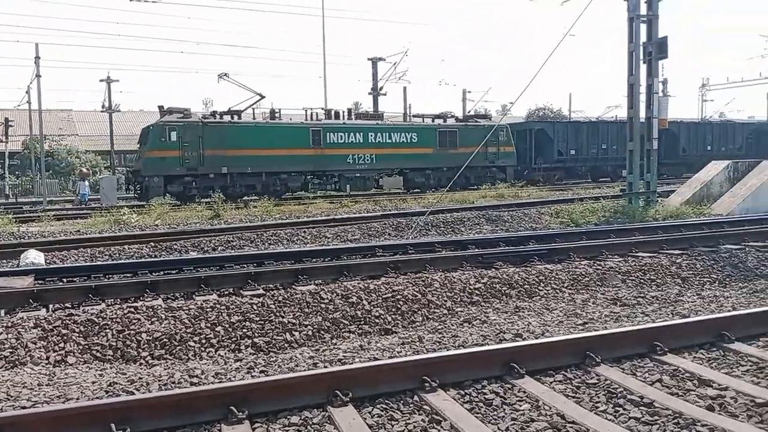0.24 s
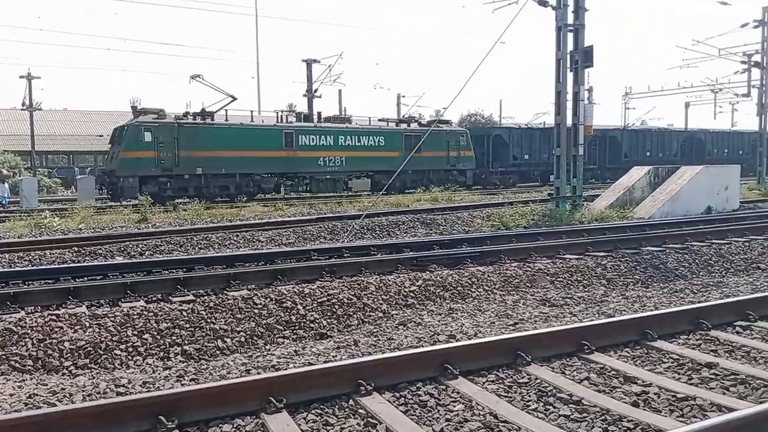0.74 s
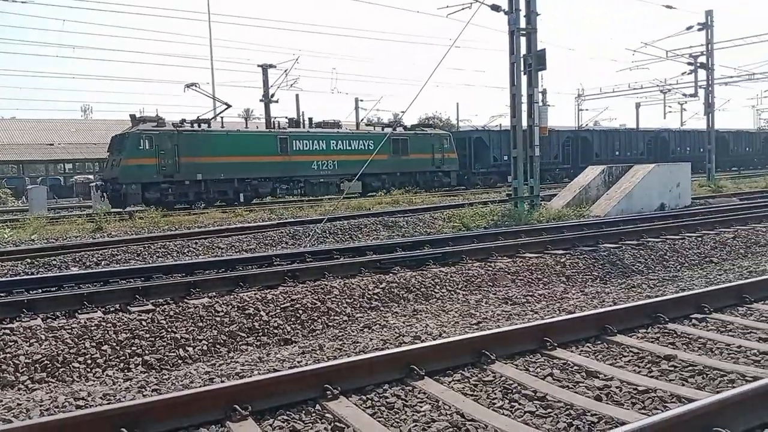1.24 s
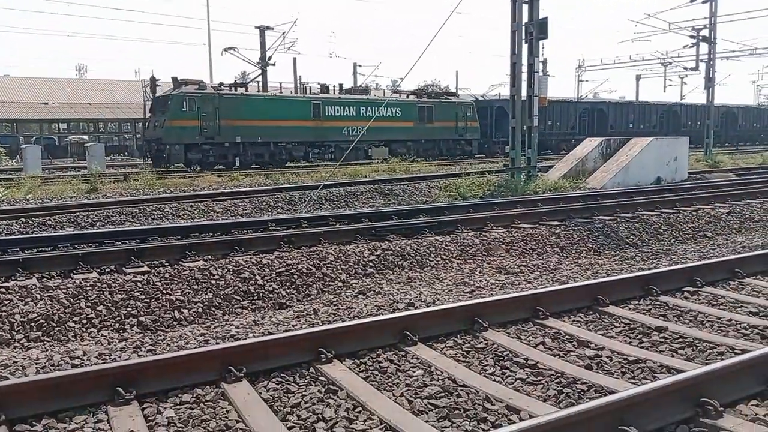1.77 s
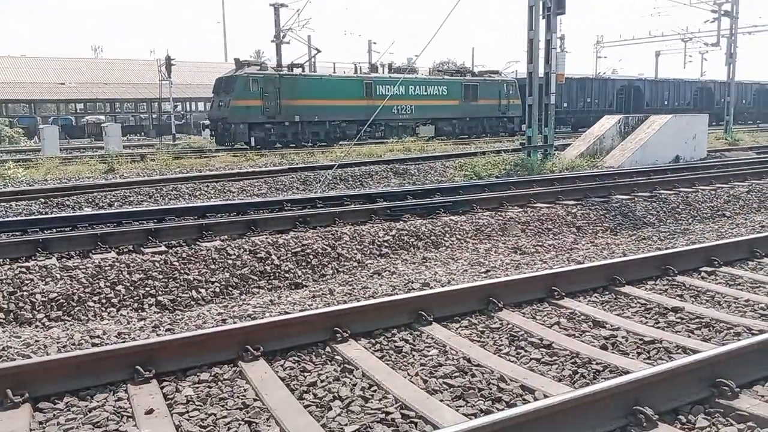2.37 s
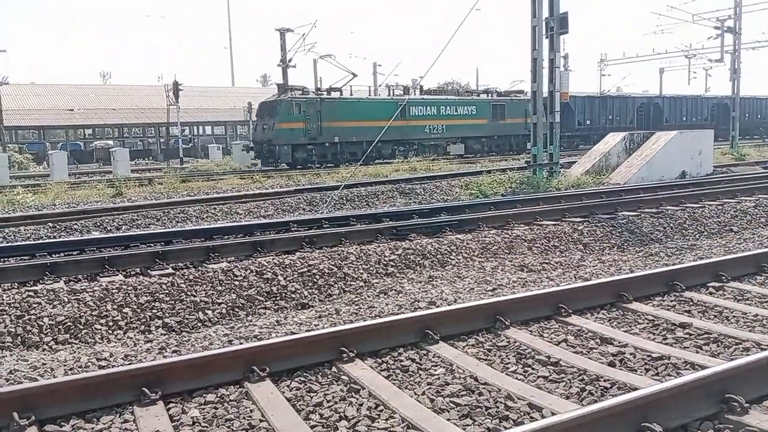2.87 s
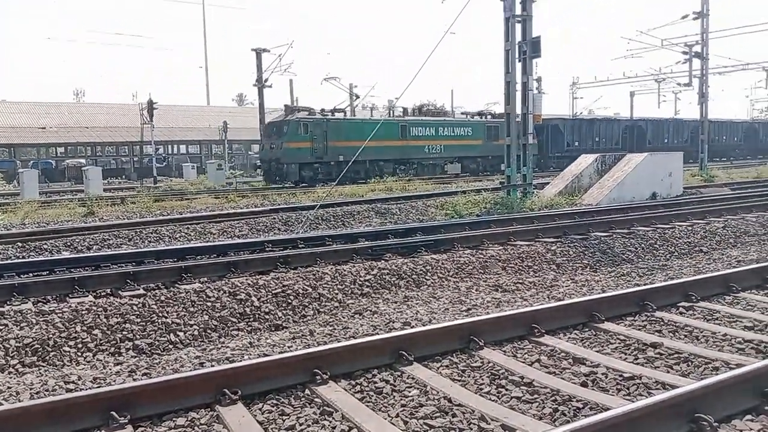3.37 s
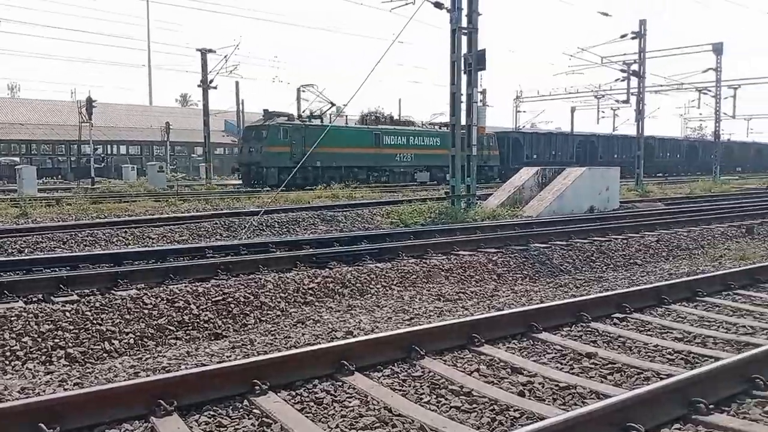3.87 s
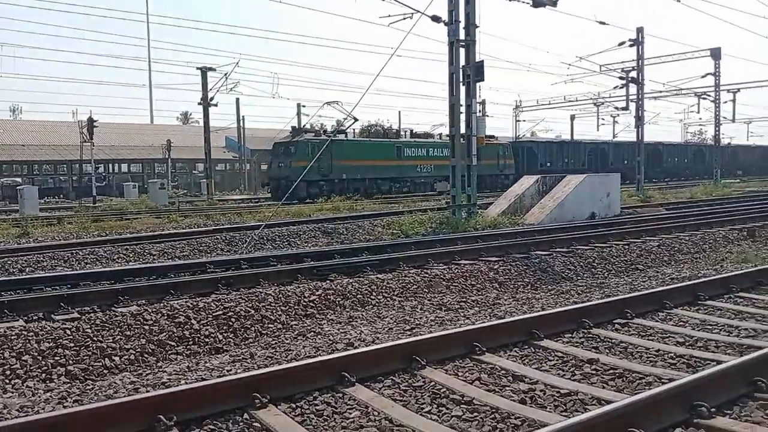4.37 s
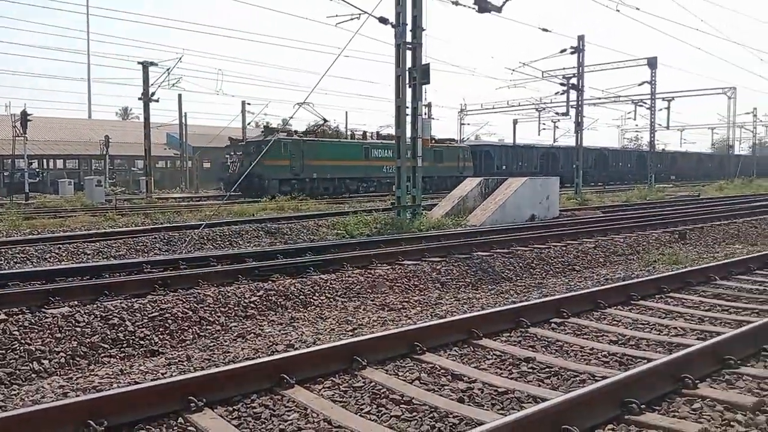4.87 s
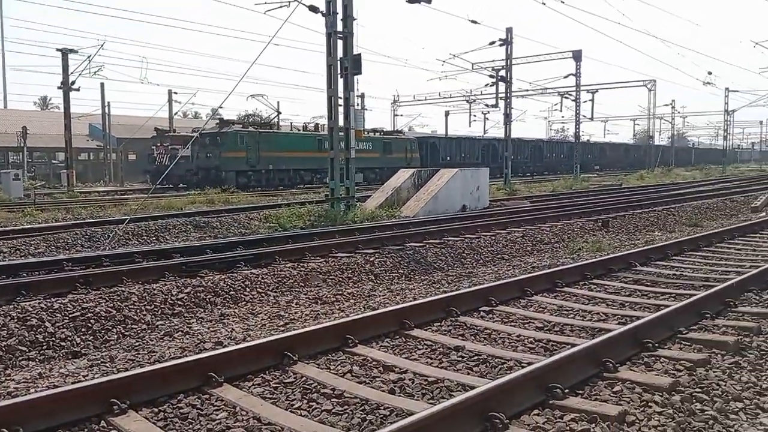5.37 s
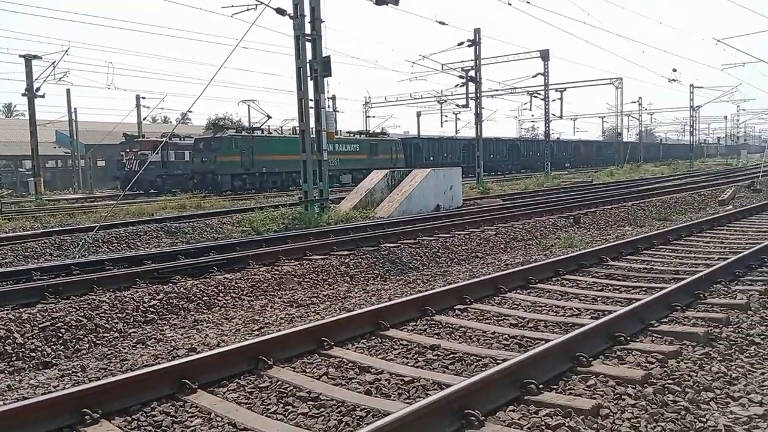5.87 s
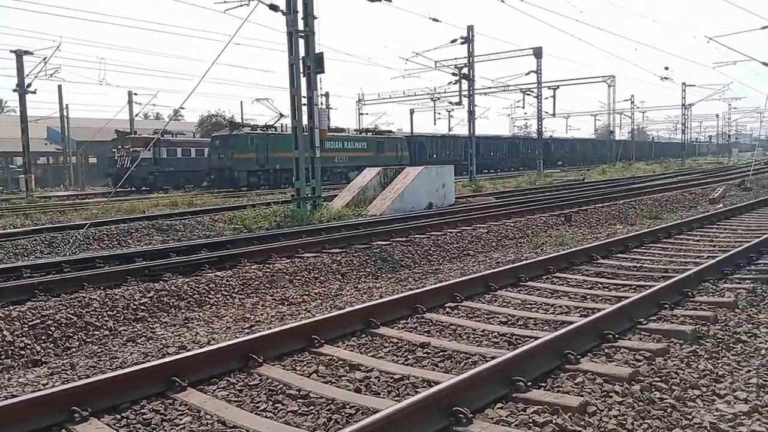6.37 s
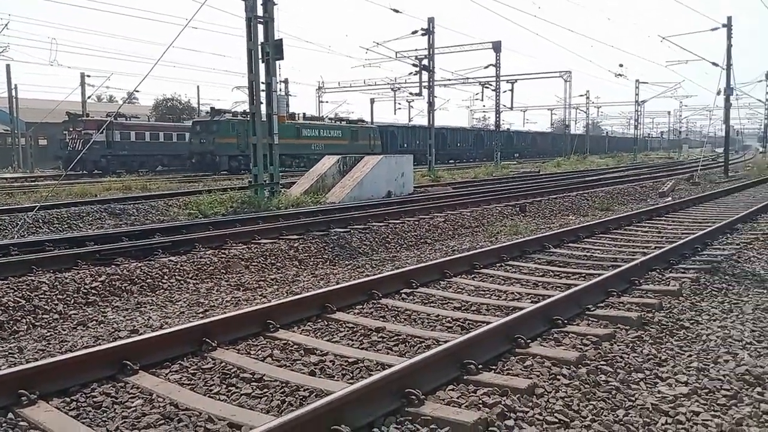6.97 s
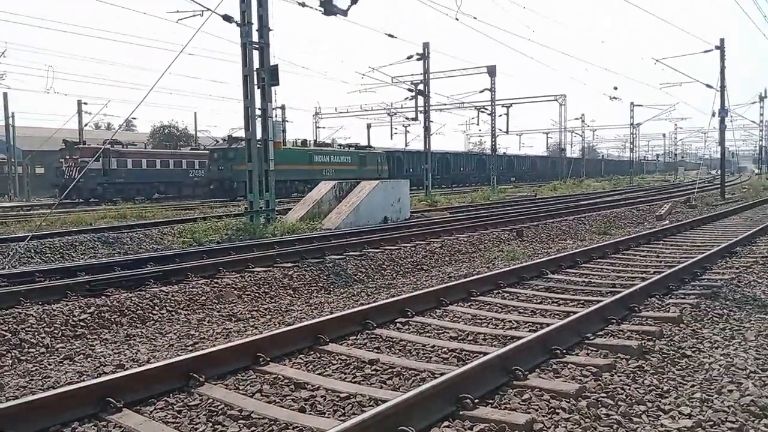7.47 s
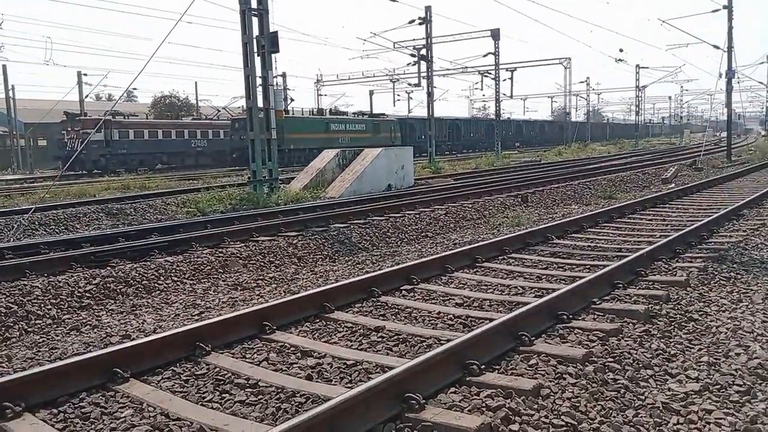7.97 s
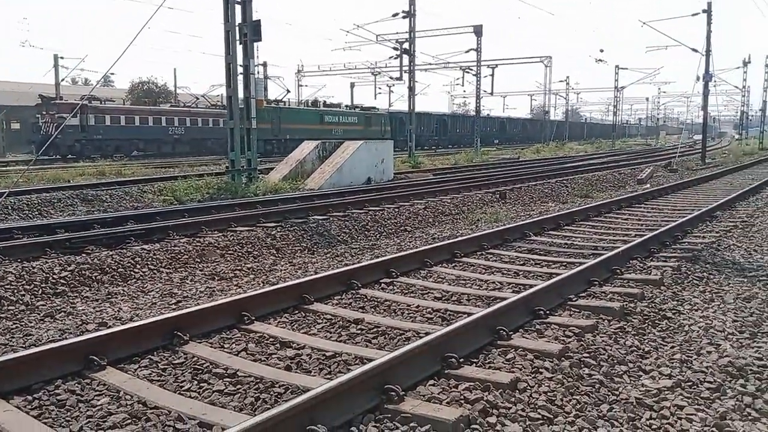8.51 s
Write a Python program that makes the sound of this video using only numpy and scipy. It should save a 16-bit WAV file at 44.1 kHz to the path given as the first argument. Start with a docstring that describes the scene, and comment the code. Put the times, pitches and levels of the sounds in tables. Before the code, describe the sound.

Outdoors in a rail yard, a locomotive drones low and whines faintly while wheels roll and rasp. After tiny spits of air, six bright brake-air bursts snap open, sag and shut; the last two are softer, longer and nearly joined. The hiss scatters briefly off wagons and ground. Light wind touches a single mono microphone, and the background sinks under the loudest hisses.

```python
"""Air brakes in a rail yard

A freight train creeps through a yard while its brakes blow off air in six sudden bursts of shaped noise.
Each valve snaps open and its jet sags as the pressure falls; ground and wagons throw the hiss back.
Behind it wheels roll, rasp and squeak, and a locomotive drones and whines on blurred resonances.
Light wind touches a single microphone; all the background sinks under the loudest hiss."""
import sys
import numpy as np
from scipy import signal
from scipy.fft import rfft, irfft
from scipy.io import wavfile
from scipy.ndimage import uniform_filter1d

SR = 44100
rng = np.random.default_rng(int(sys.argv[2]) if len(sys.argv) > 2 else 0)


def store_pcm(level_fs):
    """Save levels as 16-bit WAV."""
    pcm = np.round(np.clip(level_fs, -1, 1) * 32767).astype(np.int16)
    wavfile.write(sys.argv[1], SR, np.atleast_2d(pcm).T)


N = 385564
TIME = np.arange(N) / SR  # s


def gain_of(db):
    """Decibels to amplitude."""
    return 10 ** (np.asarray(db) / 20)


def evened(x):
    """Scales to an rms of one."""
    return x / np.sqrt(np.mean(x ** 2) + 1e-20)


def read_spectrum(points, hz):
    """Reads a spectrum on a log-frequency axis."""
    f, value = np.transpose(points)
    return np.interp(np.log(hz + 1), np.log(f + 1), value)


def level(rows):
    """A level curve as a gain for every sample."""
    return gain_of(np.interp(TIME, *np.transpose(rows)))


def hump(t, s, rise_s, fall_s):
    """Climbs from zero at s to one, then rounds off back to zero."""
    climb = np.clip((t - s) / rise_s, 0, 1)
    return climb * (1 - np.clip((t - s - rise_s) / fall_s, 0, 1) ** 2)


def swells(rows):
    """Gain of separate soft swells, each half a cosine long."""
    return sum(gain_of(db) * np.cos(np.pi * np.clip((TIME - middle) / length, -.5, .5))
               for middle, length, db in rows)


def wander(rate_hz):
    """Smooth random motion up to about the given rate, with an rms of one."""
    hz = np.fft.rfftfreq(N, 1 / SR)
    return evened(irfft(rfft(rng.standard_normal(N)) * np.exp(-(hz / rate_hz) ** 2), N))


def ring(hz, width_hz):
    """A tone blurred to the given width, as from turbulence in a resonance."""
    r = np.exp(-np.pi * width_hz / SR)
    sway = signal.lfilter([1], [1, -2 * r, r * r], rng.standard_normal((2, N)))
    turning = np.exp(2j * np.pi * hz * TIME)
    return evened(((sway[0] + 1j * sway[1]) * turning).real)


def noise(colour, patchy_db, patch_hz, patch_s, size=1024):
    """Coloured noise whose level drifts in patches of time and frequency."""
    hz, hop = np.fft.rfftfreq(size, 1 / SR), size // 4
    a, b, patches = rng.standard_normal((3, N // hop + 5, len(hz)))
    patches = uniform_filter1d(patches, max(1, round(patch_s * SR / hop)), axis=0)
    patches = evened(uniform_filter1d(patches, max(1, round(patch_hz / hz[1])), axis=1))
    z = (a + 1j * b) * gain_of(read_spectrum(colour, hz) + patchy_db * patches)
    return evened(signal.istft(z.T, nperseg=size, noverlap=size - hop)[1][:N])


# moments within the bursts where the hiss sharpens, the later two also swelling louder:
# (time [s], rise [s], fall [s], lift [dB], extra sharpness [dB])
HISS_SURGES = [(2.865, 0.046, 0.33, 0, 5.5), (4.515, 0.0084, 0.13, -1, 5), (6.88, .08, 0.96, 5, 1),
               (7.71, 0.25, 0.32, 4.5, 3)]
OPEN_S, KICK_S = .008, .028  # the valve opens quickly; its kick of trapped air dies away


def jet(burst, colour, roar_hz=3900, sharp_hz=6400, dull_power=0.97, size=65536):
    """One valve snaps open; its hiss sags and its edge shifts as pressure falls, while the roar swells and ebbs."""
    start, end, close_s, start_db, sag_db, hold, roar_peak, arch_db, dull_db, kick_db, _ = burst
    span = np.flatnonzero(TIME > start - OPEN_S / 2)[:size]
    t = TIME[span]
    age = np.maximum(t - start, 0)
    spent = np.minimum(age / (end - start), 1)

    jet_db = start_db - sag_db * spent ** hold + kick_db * np.exp(-age / KICK_S)
    roar_db = -arch_db * (spent - roar_peak) ** 2
    sharp_db = -dull_db * spent ** dull_power
    for s, rise_s, fall_s, lift_db, sharper_db in HISS_SURGES:
        surge = hump(t, s, rise_s, fall_s)
        jet_db = jet_db + lift_db * surge
        sharp_db = sharp_db + sharper_db * surge
    jet_db = jet_db - 20 * np.maximum(t - end, 0) / close_s

    # split the coloured noise into low roar, core and sharp edge
    hz = np.fft.rfftfreq(size, 1 / SR)
    air = rfft(rng.standard_normal(size)) * gain_of(read_spectrum(colour, hz))
    low = 1 / (1 + (hz / roar_hz) ** 20)
    high = 1 - 1 / (1 + (hz / sharp_hz) ** 20)
    roar, core, edge = (irfft(air * share, size)[:len(t)] for share in (low, 1 - low - high, high))

    # centre the moves of each band on the loud part of the burst
    weight = gain_of(2 * jet_db)
    roar = roar * gain_of(roar_db - np.average(roar_db, weights=weight))
    edge = edge * gain_of(sharp_db - np.average(sharp_db, weights=weight))
    hiss_rms = np.sqrt(np.average((core + edge) ** 2, weights=weight))
    valve = np.clip((t - start) / OPEN_S + .5, 0, 1)
    out = np.zeros(N)
    out[span] = valve * gain_of(jet_db) * (roar + core + edge) / hiss_rms
    return out


# small spits of air: (time [s], rise [s], decay [s], level [dB])
AIR_SPITS = [(.652, 0.0054, 0.34, -31.5), (.712, .011, 0.0099, -24.5), (2.02, 0.046, 0.027, -28.5)]
# their colour: (frequency [Hz], relative density [dB per Hz])
SPIT_COLOUR = [(2500, -6), (4200, 0), (5500, 8.5), (6800, -5), (9000, -17.5), (15000, -39)]


def spits():
    """Valves that lift for an instant and reseat."""
    lift = np.zeros(N)
    for s, rise_s, decay_s, db in AIR_SPITS:
        opening = np.clip((TIME - s) / rise_s, 0, 1)
        lift += opening * np.exp(-np.maximum(TIME - s - rise_s, 0) / decay_s) * gain_of(db)
    return lift * noise(SPIT_COLOUR, patchy_db=1, patch_hz=600, patch_s=.03)


# bursts of air: (valve opens [s], valve closes [s], time to fall 20 dB on closing [s], level [dB],
# sag by the end [dB], power of the sag curve (high = sags late) [-], roar peak as share of the burst [-],
# drop of the roar one burst length from its peak [dB], dulling by the end (negative = sharpens) [dB],
# opening kick [dB], seepage after closing relative to level [dB])
AIR_BURSTS = [ (0.936, 1.554, 0.031, -13.5, 10.2, 4.5, 0.13, 14, -4, -1.5, -12),
              (2.786, 3.256, 0.066, -12, 5.1, 5.2, .24, 9.9, -0.5, 1.5, -14.5),
              (4.38, 5.298, 0.058, -13.5, 8.25, 0.89, .47, 21, 6, 1.5, -19),
              (5.474, 5.774, 0.041, -15, 1.8, 1.2, 0.6, 11, 7.5, 2, -46),
              (6.245, 7.434, 0.13, -19.5, 6.6, 1.2, 0.67, 10.4, 2.5, 0, -26),
              (7.699, 8.74, .1, -23, 2.5, 1.2, 1, 4.8, 1, -3, -19), ]
# colour of each jet in turn: (frequency [Hz], relative density [dB per Hz])
COLOUR_1 = [(350, -77), (600, -20), (788, -11.5), (993, -11), (1450, 0.5), (1860, -4), (2040, -0.5),
            (3820, -14), (5510, 4), (6230, -1.5), (6760, -9), (7540, -8), (9890, -21.5), (12100, -12.5),
            (15500, -21)]
COLOUR_2 = [(410, -65), (700, -33), (907, -13), (980, -20), (1430, -11), (1800, -16.5), (3070, -7),
            (4300, -21.5), (4700, -8.5), (5500, 2), (6940, -2.5), (8990, -24.5), (9720, -22),
            (10900, -24.5), (15500, -20.5)]
COLOUR_3 = [(710, -32), (1200, -21), (1360, -10), (1860, -12.5), (3140, -5.5), (3610, -8), (4070, -19),
            (5260, 1.5), (5850, 0.5), (7170, -3.5), (8600, -20.5), (9270, -24), (12000, -24.5),
            (13800, -27), (15500, -22)]
COLOUR_4 = [(1000, -55), (1700, -26), (1880, -24), (2240, -26), (3400, -17), (4130, -21.5), (4920, -11.5),
            (5400, -1), (7190, -11.5), (8580, -29), (9760, -28), (10600, -33), (12200, -27), (13700, -39),
            (15500, -33)]
COLOUR_5 = [(880, -45), (1500, -16), (2070, -16), (2620, -9.5), (3440, -8), (4140, -15), (4990, -1),
            (5670, 1.5), (6310, -8), (7600, -16), (8210, -23.5), (10300, -28), (11800, -28), (13400, -32),
            (15500, -31)]
COLOUR_6 = [(1000, -40), (1700, -30), (1930, -42), (2140, -15.5), (2630, -16.5), (3430, -8.5), (3870, -15),
            (4570, -10), (4970, -2), (5600, 0.5), (6090, -6), (7530, -15), (8900, -25), (14900, -32),
            (15500, -34)]


def brakes(flutter_db=.6, sputter_db=0.54):
    """All the escaping air, fluttering with the eddies of the jets."""
    colours = (COLOUR_1, COLOUR_2, COLOUR_3, COLOUR_4, COLOUR_5, COLOUR_6)
    air = sum(jet(burst, colour) for burst, colour in zip(AIR_BURSTS, colours))
    flutter = flutter_db * wander(19) + sputter_db * wander(400)
    return (air + spits()) * gain_of(flutter)


# early reflections of the hiss: (mean delay [ms], level [dB])
REFLECTIONS = [(.9, -19), (2.3, -15), (3.7, -17), (8.5, -16)]


def bounces(x, sway_ms=0.1):
    """Ground and wagon reflections comb the hiss; the paths shift as train and listener move."""
    out = x
    for ms, db in REFLECTIONS:
        delay_s = (ms + sway_ms * wander(0.79)) / 1000
        out = out + gain_of(db) * np.interp(TIME - delay_s, TIME, x)
    return out


# echoes of the yard: (frequency [Hz], time to fall 60 dB [s])
YARD_DECAY = [(500, .35), (3000, .8), (6000, .5), (9000, .28), (15000, .19)]


def yard(x, size=256):
    """Scattered echoes from wagons and sheds, a decaying noise tail; the highest treble dies first."""
    hz, t, z = signal.stft(rng.standard_normal(SR), SR, nperseg=size)
    fading = gain_of(-60 * t / read_spectrum(YARD_DECAY, hz)[:, None])
    tail = signal.istft(z * fading, SR, nperseg=size)[1]
    tail = tail * np.minimum(np.arange(len(tail)) / (0.035 * SR), 1)  # echoes build up over 35 ms
    return signal.fftconvolve(x, tail / np.linalg.norm(tail))[:N]


BLEED_DB_PER_S = 63  # fading of the seepage after closing


def bleed():
    """Gain of the seeping air, which builds up during each burst and fades once its valve has closed."""
    gain = np.zeros(N)
    for start, end, _, db, *_, seep_db in AIR_BURSTS:
        build = np.clip((TIME - start) / (end - start), 0, 1)
        gain += build * gain_of(db + seep_db - BLEED_DB_PER_S * np.maximum(TIME - end, 0))
    return gain


# colours of rolling, rasp and pipe leak: (frequency [Hz], relative density [dB per Hz])
ROLL_COLOUR = [(200, -39), (290, -18.5), (440, -39.5), (570, -23), (670, -5), (730, -3), (800, -9),
               (900, -7.5), (1070, -11.5), (1330, -0.5), (1470, 1), (1750, -7.5), (2100, -11), (2350, -18),
               (4000, -25), (8000, -104)]
RASP_COLOUR = [(500, -50), (1700, -21), (2200, 8), (2600, 2.5), (3100, 3.5), (3650, 1.5), (4100, -42),
               (5000, -30), (9000, -63)]
LEAK_COLOUR = [(3700, -31), (4450, -3), (4800, 5.5), (5400, 9), (6100, 5), (7000, -1.5), (7900, -8.5),
               (9000, -31), (12000, -35), (15000, -50)]
# rolling wheels, their rasp on the rails, steady leak of the brake pipe: (time [s], level [dB])
ROLL_LEVEL = [(0, -26.5), (.85, -26), (2.7, -30.5), (3.3, -31), (4.2, -34), (6.1, -35), (7.3, -30.5),
              (8.74, -31.5)]
RASP_LEVEL = [(0, -49), (1.7, -38), (3.4, -39.5), (5.4, -44), (5.9, -50), (8.74, -68)]
LEAK_LEVEL = [(0, -40.5), (2.7, -38), (4.2, -42.5), (8.74, -40.5)]
# faint high squeaks, and soft low tones that swell briefly, two of them near the blower's pitches:
# (time [s], length [s], frequency [Hz], peak level [dB])
BRIEF_TONES = [(0, 0.36, 10500, -62), (0.07, 0.15, 9900, -61), (.25, 0.22, 473, -48),
               (.35, 0.36, 11200, -70), (0.428, 0.18, 9930, -52.5), (2.192, .12, 9950, -66),
               (3.5, .2, 11550, -77), (3.734, 0.37, 1373, -35), (5.527, 0.66, 890, -38.5),
               (7.757, 0.198, 370, -56)]


def train(tone_width=0.015):
    """Wheels roll and rasp as noise and the brake pipe leaks, among brief blurred tones high and low."""
    roll = level(ROLL_LEVEL) * noise(ROLL_COLOUR, patchy_db=3, patch_hz=120, patch_s=.13, size=2048)
    rasp = level(RASP_LEVEL) * noise(RASP_COLOUR, patchy_db=4.5, patch_hz=130, patch_s=.14, size=2048)
    leak_gain = np.hypot(level(LEAK_LEVEL), bleed())
    leak = leak_gain * noise(LEAK_COLOUR, patchy_db=1.8, patch_hz=180, patch_s=.1)
    tones = np.zeros(N)
    for s, length, hz, db in BRIEF_TONES:
        swell = np.sin(np.pi * np.clip((TIME - s) / length, 0, 1))
        tones += gain_of(db) * swell * ring(hz, tone_width * hz)  # width as a share of the pitch
    return roll + rasp + leak + tones


# drone resonances: (frequency [Hz], width [Hz], relative level [dB])
DRONE_RINGS = [(215.4, 7, -1.5), (239.4, 9.3, -2.5), (228.8, 60, 0.5)]
# the drone comes and goes, and ends far down: (time [s], level [dB])
DRONE_LEVEL = [(0, -26.5), (.52, -29), (1.5, -55), (1.8, -36), (2.17, -52.5), (2.57, -31), (2.75, -42),
               (3.3, -57.5), (5, -47), (5.5, -55), (8.74, -58.5)]
# short low booms on the same resonances: (middle [s], length [s], level [dB])
DRONE_BOOMS = [(1.24, 0.34, -39), (3.86, 0.23, -37.5), (4.4, 0.22, -40), (4.58, 0.13, -32),
               (4.77, 0.23, -39), (5.01, 0.064, -39), (5.18, 0.15, -36), (5.78, .09, -43), (8.06, .13, -37)]
# blade tone of the cooling blower: (time [s], level [dB])
BLADE_LEVEL = [(0, -33.5), (.25, -40), (.8, -39.5), (1.55, -61), (1.63, -30.5), (2.25, -33), (2.4, -42),
               (2.64, -32), (2.9, -46.5), (5, -45.5), (6.3, -47.5), (7.4, -38.5), (7.8, -47.5), (8.3, -41),
               (8.74, -46)]
# blower duct resonances: (frequency [Hz], width [Hz], level [dB])
DUCT_RINGS = [(698.5, 55, -48.5), (887, 27, -47.5), (1380, 17, -46)]
BLADE_HZ = 694  # mean pitch of the blade tone


def locomotive(octave_db=-13, waver_hz=2, fading_db=2.7):
    """A beating low drone of close resonances and the whine of the cooling blower."""
    drone = evened(sum(gain_of(db) * ring(hz, width) for hz, width, db in DRONE_RINGS))
    # quick beats, but a steady strength
    drone = drone / np.sqrt(uniform_filter1d(drone ** 2, size=5000) + 0.0071)
    turn = 2 * np.pi * np.cumsum(BLADE_HZ + waver_hz * wander(7.1)) / SR
    whine = np.sin(turn) + gain_of(octave_db) * np.sin(2 * turn)
    # moving air makes the distant tone fade in and out
    blade = evened(whine * gain_of(fading_db * wander(2.5)))
    ducts = sum(gain_of(db) * ring(hz, width) for hz, width, db in DUCT_RINGS)
    drone_gain = np.hypot(level(DRONE_LEVEL), swells(DRONE_BOOMS))
    return drone_gain * drone + level(BLADE_LEVEL) * blade + ducts


# colour of the thin hiss: (frequency [Hz], relative density [dB per Hz])
THIN_HISS_COLOUR = [(3000, -13), (4200, 1), (5200, 4), (9300, -23.5), (11000, -35), (15000, -35)]
# its level, nearly gone after the first two seconds: (time [s], level [dB])
THIN_HISS_LEVEL = [(0, -37), (.9, -44), (1.8, -33), (2.3, -74), (4, -74), (8.74, -78)]


def thin_hiss():
    """A thin, bright hiss in the first two seconds, made of patchy noise."""
    return level(THIN_HISS_LEVEL) * noise(THIN_HISS_COLOUR, patchy_db=3, patch_hz=250, patch_s=.12)


# colours of wind and distant yard: (frequency [Hz], relative density [dB per Hz])
WIND_COLOUR = [(20, -29), (45, -23), (66, 0), (125, 4.5), (180, -7), (280, -21), (400, -41), (1000, -49),
               (4000, -100)]
FAR_COLOUR = [(30, -20), (100, -7.5), (330, 0.5), (450, -5.5), (900, -8.5), (3000, -36), (10000, -49)]
# the breeze dies down: (time [s], level [dB])
WIND_LEVEL = [(0, -51), (2.6, -51.5), (3, -52.5), (4.5, -55.5), (8.74, -58)]
# puffs of wind: (middle [s], length [s], level [dB])
WIND_PUFFS = [(.6, .15, -39), (1, 0.094, -35), (1.73, 0.33, -43.5), (2.25, .12, -44), (2.66, 0.11, -42),
              (3.61, 0.087, -42.5), (4.5, .09, -39), (5.75, 0.13, -44), (7.69, 0.065, -49),
              (8.55, 0.061, -43)]


def wind(far_db=-57, lump_db=4.5):
    """Soft lumps of low wind noise on the microphone, over the distant yard."""
    breeze = np.hypot(level(WIND_LEVEL) * gain_of(lump_db * wander(11)), swells(WIND_PUFFS))
    gusts = breeze * noise(WIND_COLOUR, patchy_db=1.5, patch_hz=120, patch_s=.07, size=2048)
    far = noise(FAR_COLOUR, patchy_db=1.0, patch_hz=150, patch_s=0.038, size=2048)
    return gusts + gain_of(far_db) * far


# the background sinks by this share of the hiss's excess level
DUCK_ABOVE_DB, DUCK_SHARE = -18.5, 0.99


def ducking(air, settle_s=0.09):
    """Gain of the background, which sinks while the hiss is loudest and then comes back."""
    keep = np.exp(-1 / (settle_s * SR))
    power = signal.lfilter([1 - keep], [1, -keep], air ** 2)
    power_db = 10 * np.log10(power + 1e-12)
    return gain_of(-DUCK_SHARE * np.maximum(power_db - DUCK_ABOVE_DB, 0))


def scene(direct_db=-1.88, yard_db=-14):
    """One microphone feeds both channels."""
    air = bounces(brakes())
    hiss = gain_of(direct_db) * air + gain_of(yard_db) * yard(air)
    background = train() + locomotive() + thin_hiss() + wind()
    mono = hiss + ducking(hiss) * background
    return np.array([mono, mono])


EDGE_HZ = 15550  # top of the band


def record(dry):
    """The band limit of the recorder: a steep low-pass."""
    lowpass = signal.firwin(511, EDGE_HZ, window=("kaiser", 9), fs=SR)
    return signal.oaconvolve(dry, lowpass[None], "same")


dry = scene()
out = record(dry)
store_pcm(out)
```